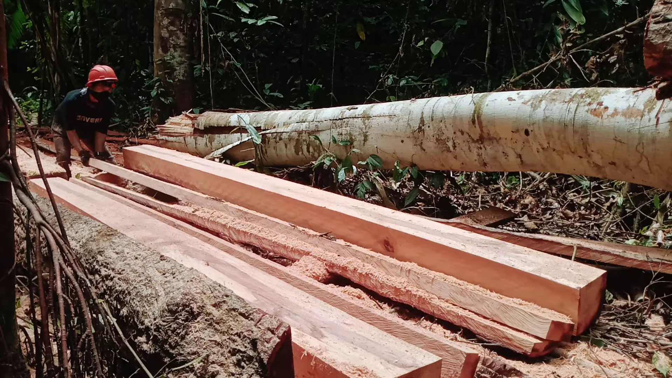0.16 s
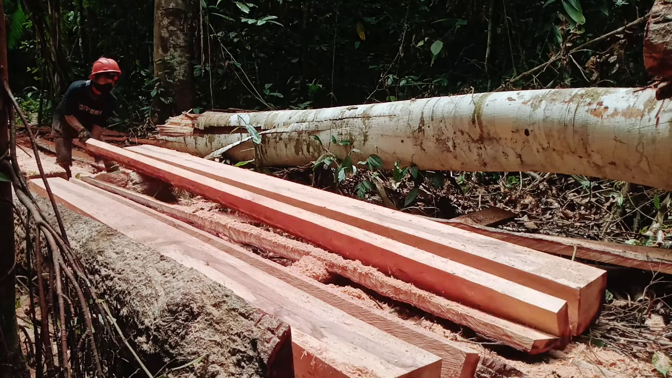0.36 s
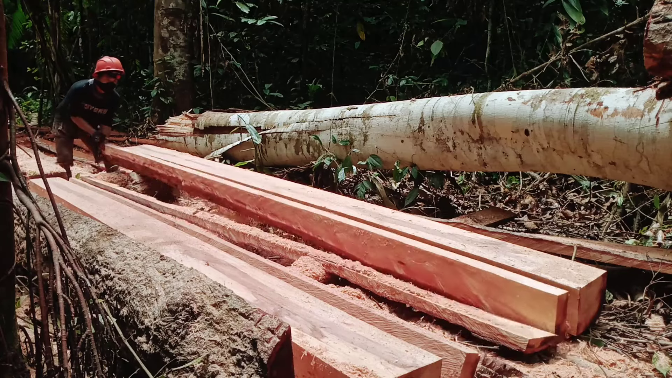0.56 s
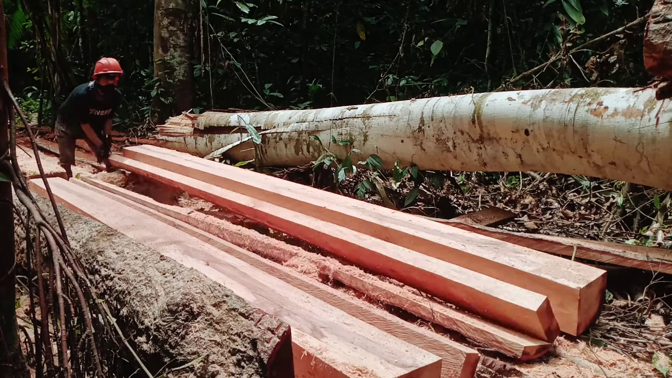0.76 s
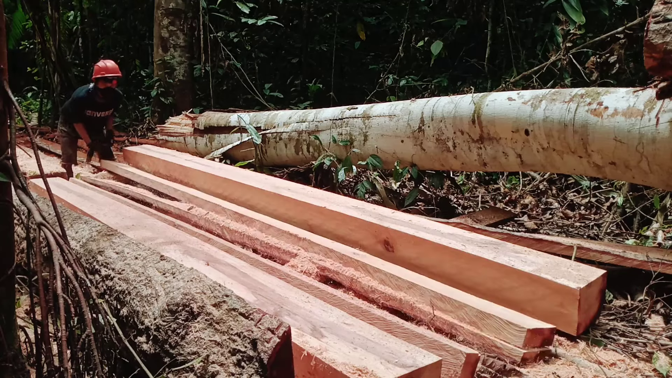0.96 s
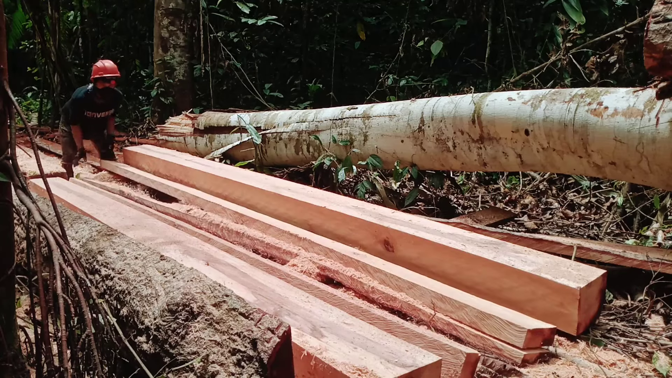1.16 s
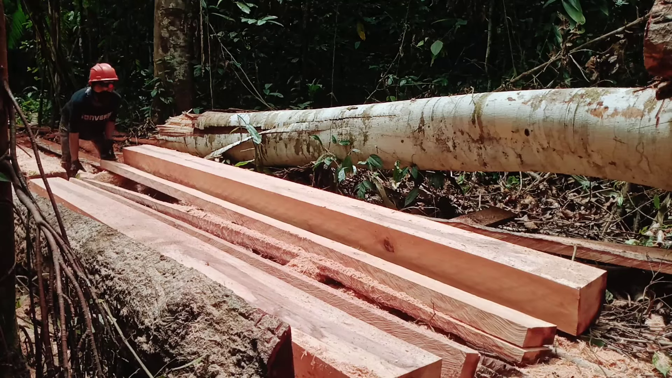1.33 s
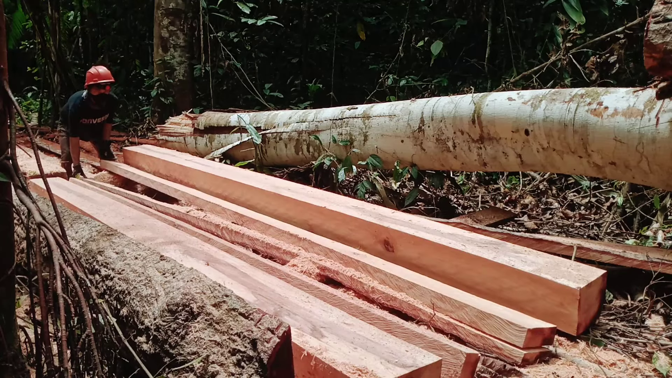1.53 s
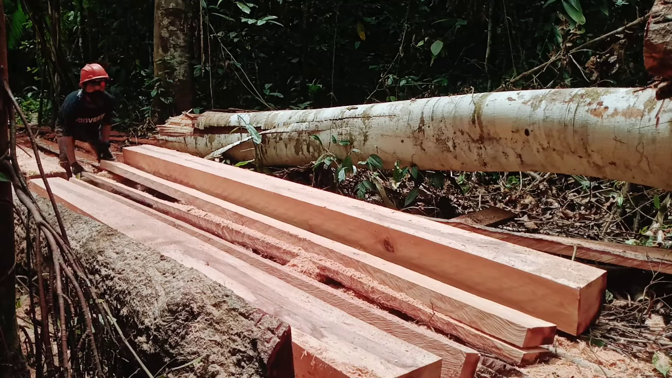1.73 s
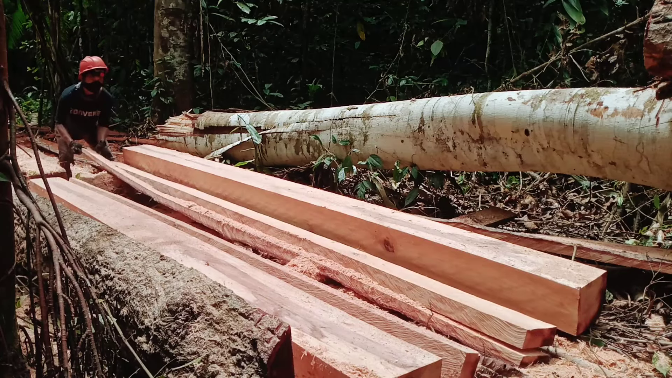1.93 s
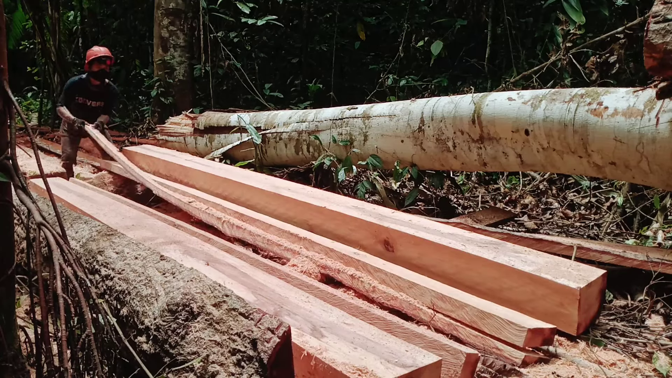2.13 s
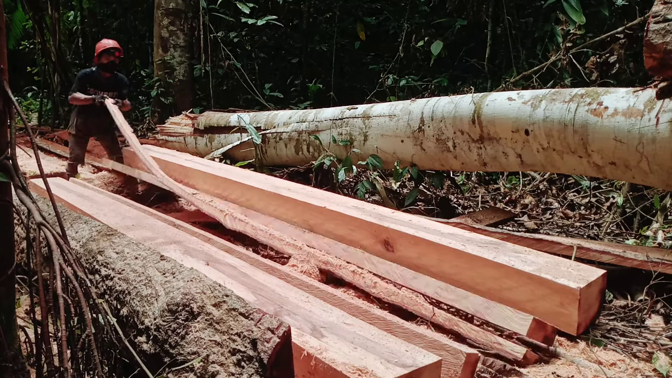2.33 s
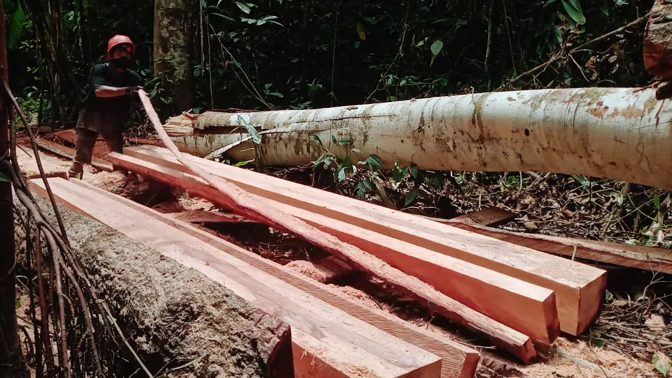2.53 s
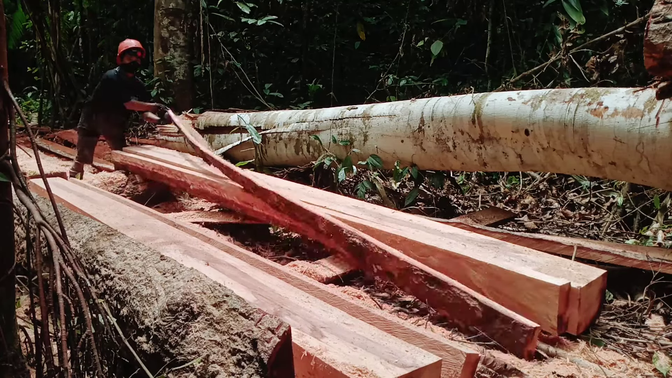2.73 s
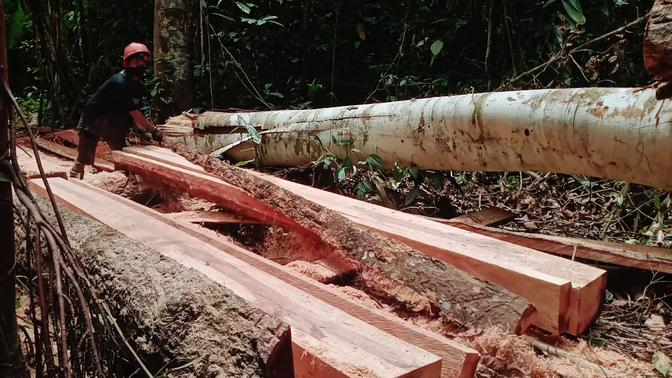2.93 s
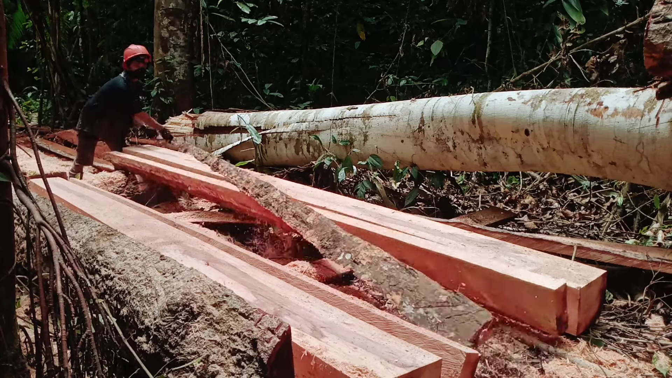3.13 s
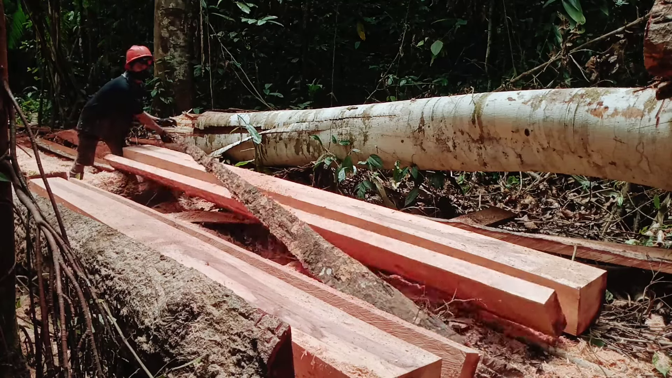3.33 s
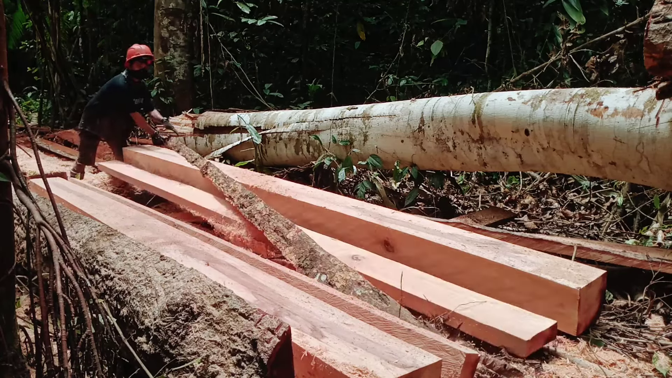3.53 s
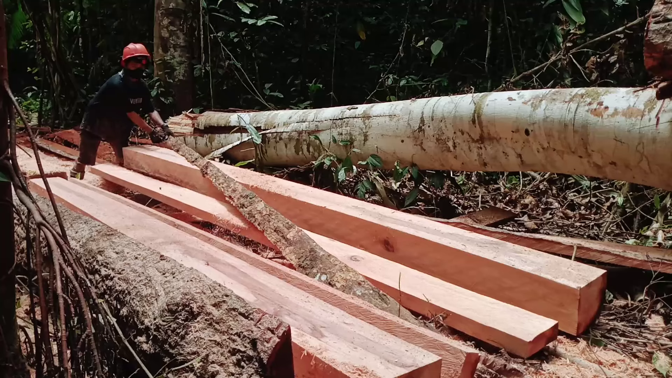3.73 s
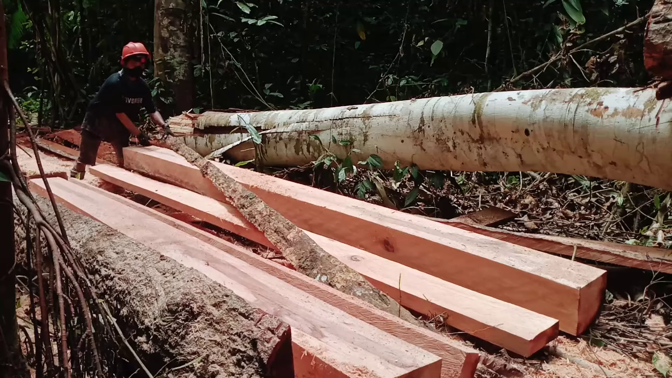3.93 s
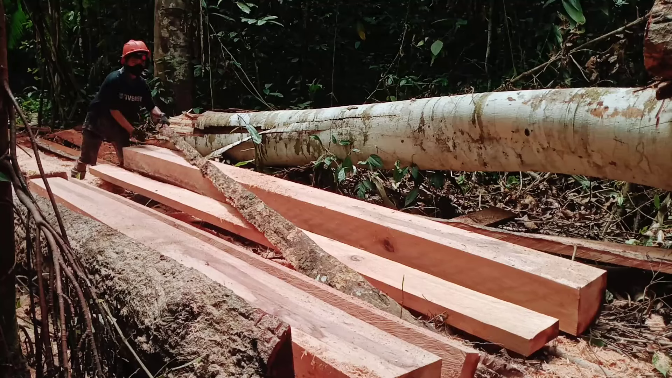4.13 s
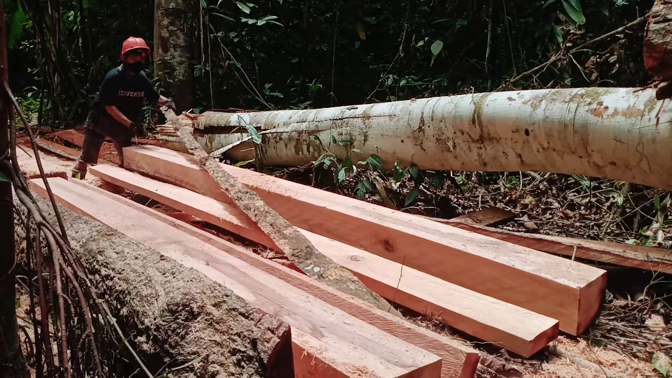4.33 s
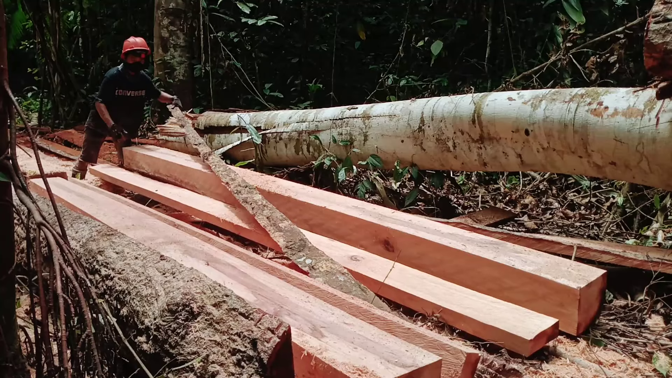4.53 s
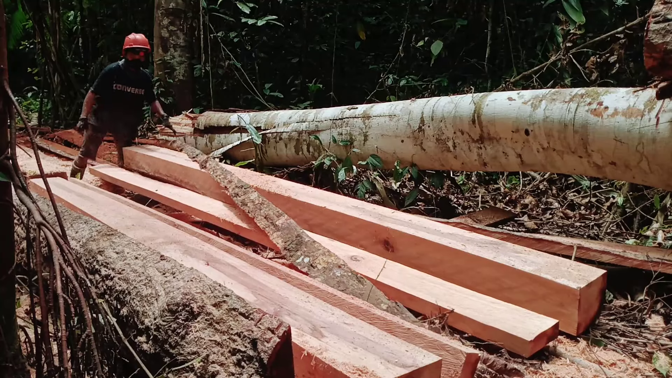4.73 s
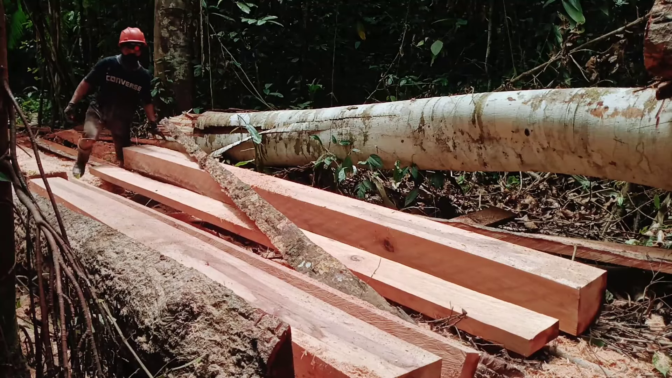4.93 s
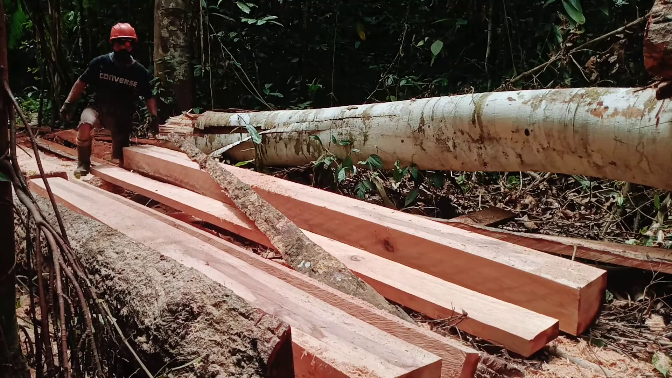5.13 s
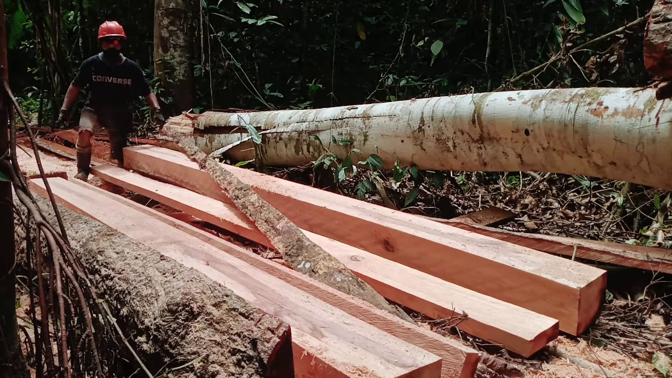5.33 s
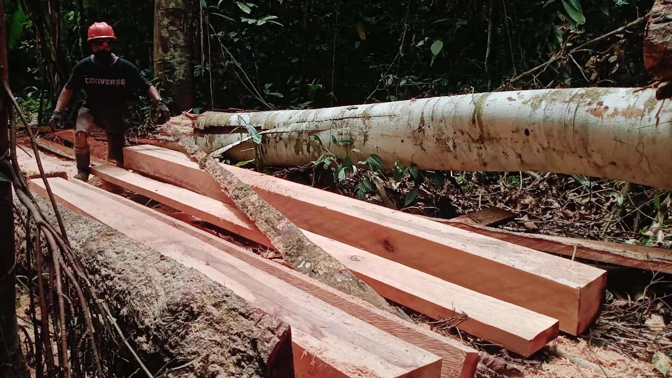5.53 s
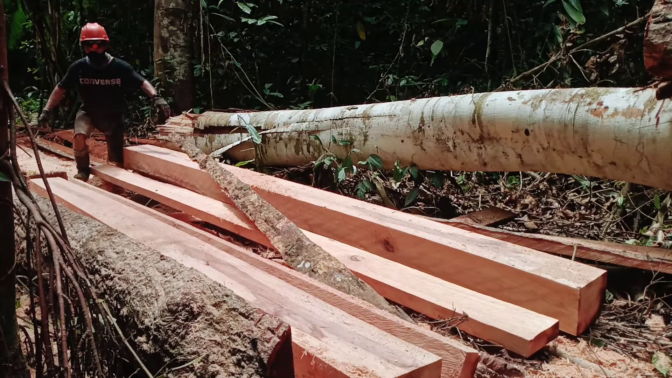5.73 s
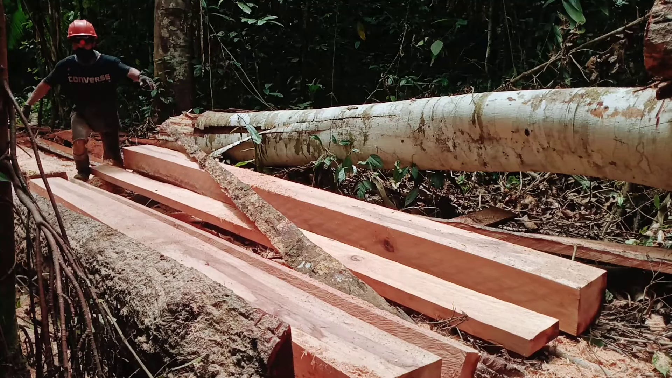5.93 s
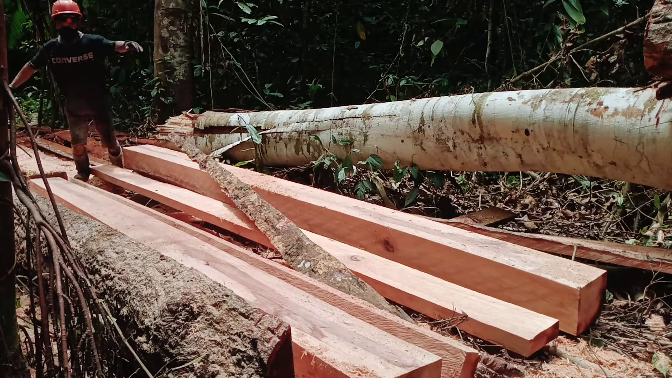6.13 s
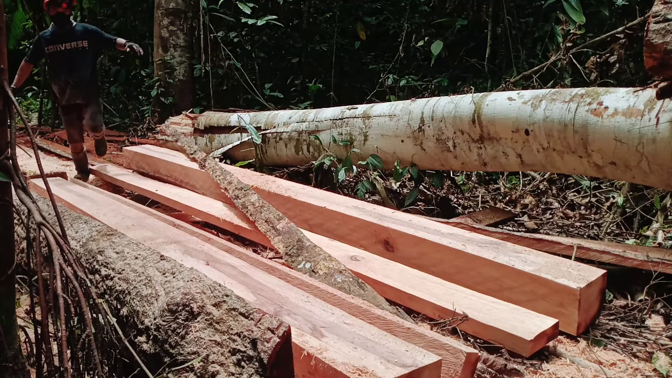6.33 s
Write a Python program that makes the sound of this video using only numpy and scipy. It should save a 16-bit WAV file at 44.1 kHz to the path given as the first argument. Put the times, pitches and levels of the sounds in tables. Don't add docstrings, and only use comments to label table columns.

```python
import sys
import numpy as np
from scipy import signal
from scipy.fft import rfft, irfft, next_fast_len
from scipy.io import wavfile
from scipy.ndimage import uniform_filter1d

SR = 44100
rng = np.random.default_rng(int(sys.argv[2]) if len(sys.argv) > 2 else 0)


def transcribe(signal):
    frames = np.atleast_2d(signal).T
    limited = np.clip(frames, -1, 1)
    pcm = np.round(limited * 32767).astype(np.int16)
    wavfile.write(sys.argv[1], SR, pcm)


def linear_from_db(decibels):
    return 10 ** (np.asarray(decibels, float) / 20)


N = 285969
CLOCK = 32


def colour(x, points):
    hz, db = np.transpose(points)
    size = next_fast_len(len(x), True)
    log_f = np.log(np.fft.rfftfreq(size, 1 / SR) + 1)
    outside = np.maximum(np.log(hz[0]) - log_f, 0) + np.maximum(log_f - np.log(hz[-1]), 0)
    gain = linear_from_db(np.interp(log_f, np.log(hz), db) - 25 * outside)
    return irfft(rfft(x, size) * gain, size)[:len(x)]


def band(x, lo_hz, hi_hz, order=2):
    return signal.sosfilt(signal.butter(order, [lo_hz, hi_hz], "band", fs=SR, output="sos"), x)


def unit(x):
    return x / np.sqrt(np.mean(x ** 2))


def walk(rate):
    hold = int(SR / rate)
    steps = np.repeat(rng.standard_normal(N)[:N // hold + 1], hold)
    return 1.4 * uniform_filter1d(uniform_filter1d(steps, hold), hold)[:N]


def add(out, s, x):
    i = int(s * SR)
    out[i:i + len(x)] += x[:N - i]


def swell(s, db, rise_s, fall_s, hold_s=0):
    s, db, rise_s, fall_s, hold_s = (np.reshape(v, (-1, 1)) for v in (s, db, rise_s, fall_s, hold_s))
    t = np.arange(0, N, CLOCK) / SR
    before = np.maximum(s - t, 0) / np.abs(rise_s)
    after = np.maximum(t - s - hold_s, 0) / np.abs(fall_s)
    return linear_from_db(db - 10 * (before + after))


def together(*gains):
    power = np.sum(np.vstack(gains) ** 2, axis=0)
    return np.interp(np.arange(N) / CLOCK, np.arange(len(power)), np.sqrt(power))


def ring(modes, stretch, longest, tilt_db=0, phase=0):
    hz, db, t60 = np.transpose(modes)[:, :, None]
    t = np.arange(.36 * SR) / SR
    decay = np.exp(-np.log(1000) * t / (stretch * np.minimum(t60, longest)))
    decay = decay * (1 - (t / t[-1]) ** 4)
    return np.sum(linear_from_db(db + tilt_db) * decay * np.sin(2 * np.pi * hz * t + phase), axis=0)


def resonate(x, hz, t60):
    r = 1000 ** (-1 / (t60 * SR))
    return unit(signal.lfilter([1, -1], [1, -2 * r * np.cos(2 * np.pi * hz / SR), r * r], x))


def grains(rate, scatter_db):
    size = linear_from_db(scatter_db * np.minimum(rng.exponential(size=N), 3.2)) * rng.choice([-1, 1], N)
    return size * (rng.random(N) < rate / SR)


def clearing(x, t60, wet_db):
    t = np.arange(.4 * SR) / SR
    tail = rng.standard_normal(len(t)) * np.exp(-np.log(1000) * t / t60) * np.minimum(t / 0.0035, 1)
    return x + linear_from_db(wet_db) * signal.fftconvolve(x, tail / np.linalg.norm(tail))[:N]


# (f/Hz, level per Hz/dB)
FOREST_SPECTRUM = [(22, -30), (45, -17.5), (96, -7.5), (200, -11.5), (500, -14.5), (2000, -21.5),
                   (3200, -21.5), (5100, -32.5), (6000, -17.5), (7000, -32), (8700, -24.5), (9900, -33),
                   (13000, -37), (15500, -35)]
# (t/s, level at 6 kHz/dB)
CHORUS_LEVEL = [(0, -74.5), (.6, -70), (1.1, -72), (1.5, -73.5), (2.1, -74), (2.6, -70), (3.0, -67),
                (3.6, -70), (4.1, -74), (4.6, -72), (5.1, -73.5), (5.7, -73), (6.48, -74.5)]
# (start t/s, duration t/s, level/dB, f/Hz)
KATYDID_SWELLS = [
    (0, 0.153, -65.5, 14520),
    (1.93, .04, -80.5, 14200),
    (3.849, .45, -80.5, 14200),
    (4.998, 0.25, -78, 14100),
    (5.851, 0.401, -76, 14140),
]
KATYDID_RISE_S, KATYDID_FALL_S = 0.1998, .12
KATYDID_CHIRPS_HZ, KATYDID_SAG_HZ = 24, 400
FAR_CRICKETS_HZ, FAR_CRICKETS_DB = 8540, 2.5


def forest():
    t = np.arange(N) / SR
    bed = colour(rng.standard_normal(N), FOREST_SPECTRUM)
    bed /= np.std(band(bed, 5600, 6540, order=4))
    far_crickets = unit(band(rng.standard_normal(N), FAR_CRICKETS_HZ - 260, FAR_CRICKETS_HZ + 260))
    bed += linear_from_db(FAR_CRICKETS_DB + 3.0 * walk(11)) * far_crickets
    bed_gain = linear_from_db(np.interp(t, *np.transpose(CHORUS_LEVEL)) + 0.91 * walk(5.1))

    start, lasts, db, hz = np.transpose(KATYDID_SWELLS)
    swells = swell(start, db, KATYDID_RISE_S, KATYDID_FALL_S, lasts)
    loudest_hz = np.repeat(hz[swells.argmax(axis=0)], CLOCK)[:N]
    chirp = t * KATYDID_CHIRPS_HZ % 1
    trill_hz = loudest_hz + KATYDID_SAG_HZ * (.5 - chirp)
    rasp = band(rng.standard_normal(N), 30, 300) * (1.3 + np.sin(np.pi * chirp) ** 2)
    trill = unit(rasp * np.sin(2 * np.pi * np.cumsum(trill_hz) / SR))
    return bed * bed_gain + trill * together(swells)


# (start t/s, end t/s)
CRICKET_PHRASES = [(0, .134), (.914, .964), (1.034, 1.082), (1.178, 1.207), (1.25, 1.304), (1.359, 1.411),
                   (1.453, 1.53), (1.56, 1.63), (1.651, 2.15), (2.657, 2.75), (2.81, 2.874), (2.936, 3.004),
                   (3.111, 3.18), (3.228, 3.29), (3.339, 3.403), (3.436, 3.487), (3.589, 4.127),
                   (4.623, 4.70), (4.875, 4.949), (4.966, 4.972), (5.009, 5.058), (5.103, 5.153),
                   (5.185, 5.242), (5.27, 5.34), (5.377, 5.452), (5.47, 5.55), (5.577, 6.018)]
CRICKET_DB = -57.5
STROKE_SAG_HZ, STROKE_DRIFT, STROKE_SLIP = 330, .003, .9


def cricket(rate_hz=83.7, tone_hz=8590):
    out = np.zeros(N)
    t = np.arange(int(0.00812 * SR)) / SR
    chance = rng.standard_normal((len(CRICKET_PHRASES), 100, 3))
    for (start, end), draws in zip(CRICKET_PHRASES, chance):
        phases = STROKE_SLIP * np.cumsum(draws[:, 2])
        strokes = int((end - start) * rate_hz * 2 + .5)
        for k, (size, drift, _) in enumerate(draws[:strokes]):
            hz = tone_hz * (1 + STROKE_DRIFT * drift) + STROKE_SAG_HZ * (.5 - t / t[-1])
            tone = np.sin(2 * np.pi * np.cumsum(hz) / SR + phases[k]) * np.hanning(len(t)) ** 0.74
            db = CRICKET_DB + 10.0 - 9.5 * (k % 2) + 0.83 * size
            add(out, start + k / rate_hz / 2, linear_from_db(db) * tone)
    return clearing(out, .06, -11)


# (start t/s, end t/s, level/dB)
GATE_DUCKS = [(0.123, 0.276, -6.5), (0.399, 0.492, -9), (1.316, 1.375, -9.5), (1.414, 1.478, -7),
              (1.535, 1.581, -5.5), (2.139, 2.28, -7), (2.318, 2.35, -12.5), (3.171, 3.221, -8),
              (4.139, 4.306, -16.5), (4.602, 4.627, -12), (4.972, 5.025, -10), (5.016, 5.141, -3),
              (5.063, 5.105, -4.5), (5.345, 5.37, 1.5), (6.018, 6.601, -15)]
GATE_LINGER, GATE_RECOVER_S = 0.22, 0.09


def gate():
    t, duck_db = np.arange(N) / SR, np.zeros(N)
    for start, end, db in GATE_DUCKS:
        shut = np.clip(np.minimum((t - start) / 0.0265, (end - t) / 0.011), 0, 1)
        linger = (t > end - .012) * GATE_LINGER * np.exp(-np.abs(t - end) / GATE_RECOVER_S)
        duck_db += db * np.maximum(shut, linger)
    return linear_from_db(duck_db)


# (t/s, peak level/dB, f/Hz)
SPLINTERS = [(.316, -42, 2500), (.577, -43, 1990), (.669, -36.5, 3000), (0.6832, -27.5, 1560),
             (.6965, -27, 2300), (.7015, -27.5, 1610), (.706, -38, 3490), (0.7473, -37.5, 1500),
             (.781, -43, 3400), (0.914, -39.5, 2200), (.959, -32.5, 1330), (1.016, -44, 1970),
             (1.0469, -45.5, 2110), (1.9696, -46, 2116), (2.0736, -47.5, 2250), (2.522, -29.5, 1223),
             (2.276, -48.5, 2430), (2.297, -47, 2900), (2.5869, -34.5, 3130), (2.6005, -31.5, 1777),
             (2.632, -37.5, 1780), (2.6543, -33, 1820), (2.689, -25, 2006), (2.938, -36, 1700),
             (2.949, -35, 2300), (2.955, -34, 1296), (2.961, -36.5, 2000), (2.981, -44.5, 2100),
             (3.013, -40.5, 3800), (3.148, -38, 1560), (3.166, -45, 3000), (3.242, -33, 2850),
             (3.3706, -34.5, 2460), (3.4524, -35, 4570), (3.532, -41.5, 4080), (4.4047, -47.5, 2892),
             (4.719, -46.5, 3505), (4.768, -46.5, 1440), (4.8555, -48.5, 2316), (4.8815, -42.5, 3200),
             (4.917, -42, 1410), (5.5654, -53.5, 3600)]
# (t/s, peak level/dB, f/Hz)
TWIGS = [(0.2741, -49, 1880), (0.3526, -47, 2500), (.643, -52, 3000), (.753, -40.5, 3500),
         (1.5839, -58, 2130), (1.8539, -47, 2810), (1.862, -51.5, 2000), (2.2633, -52, 3370),
         (2.303, -53, 3010), (2.4855, -44, 2000), (3.0066, -41, 3800), (3.5582, -33, 1300),
         (3.701, -43, 1460), (3.7837, -55.5, 1210), (4.9635, -56.5, 3000), (5.285, -59.5, 3495),
         (5.5875, -54.5, 3690)]
# (t/s, peak level/dB, f/Hz, relative top level/dB, tail t60/s)
CRACKS = [(2.3552, -31, 1106, -30, .012), (2.3575, -13.5, 2300, -25, .025), (2.3572, -29, 1377, -31, 0.02),
          (2.3607, -31, 2600, -14, .04), (2.5205, -30.5, 2600, -20, .03), (2.5235, -29, 3200, -20, .04),
          (.2918, -39, 1690, -6.5, 0.031), (.6495, -46, 3000, 4, .02), (.6763, -22.5, 3620, -15, 0.021),
          (.691, -23, 2410, -21.5, .02), (.7744, -34.5, 3700, -9.5, .02), (2.283, -62, 2995, 6, .02),
          (2.105, -66, 3000, 4, .02), (4.869, -51, 2000, -1.5, .03), (3.5407, -34, 2300, 1.5, 0.072),
          (4.7234, -47, 2400, 1.5, 0.032), (4.730, -47, 3000, 4.5, 0.0153),
          (4.7363, -42, 2500, -0.5, 0.0204), (4.7725, -48, 1940, 7, 0.025)]
SNAP_S = .0007
SPLINTER_TOP_DB, TWIG_TOP_DB, SNAP_T60_S = -19, -5, .035


def snaps():
    splinters = [(*row, SPLINTER_TOP_DB, SNAP_T60_S) for row in SPLINTERS]
    twigs = [(*row, TWIG_TOP_DB, SNAP_T60_S) for row in TWIGS]
    return splinters + twigs + list(CRACKS)


# (f/Hz, level per Hz/dB)
DUST = [(6000, -6.5), (7500, 1), (8900, 10), (10800, -4.5), (13000, -6.5), (15300, -7.5)]


def ticks():
    out, t = np.zeros(N), np.arange(8192) / SR
    spray = rng.standard_normal((len(snaps()), len(t)))
    for (s, db, hz, top_db, t60), noise in zip(snaps(), spray):
        noise = np.r_[2.5, noise[1:]]
        tail = 0.18 * np.exp(-np.log(1000) * t / max(t60, .005))
        push = noise * (np.exp(-t / SNAP_S) + tail)
        body = band(push, hz / 1.615, hz * 1.39, order=3)
        edge = colour(push, DUST)
        tick = body / np.abs(body).max() + linear_from_db(top_db + 9.5) * edge / np.abs(edge).max()
        add(out, s, linear_from_db(db + 0.04) * tick)
    return out


# (t/s, peak level/dB, contact f/Hz, ring stretch [ratio])
KNOCKS = [(0.28, -38.5, 421, 0.66), (.495, -33, 550, 0.32), (.5065, -26, 302.5, 0.594),
          (.531, -29.5, 281, 0.45), (.578, -30.5, 302, 0.54), (.59, -32.5, 697, 0.33),
          (0.5986, -32, 219, 0.63), (.668, -25, 1006, 0.71), (.677, -19.5, 1020, 0.616),
          (.686, -18.5, 817, 0.81), (.697, -23, 1062, 0.35), (.708, -37, 900, 0.41),
          (.7135, -30.5, 900, .3), (.772, -26.5, 730, 0.29), (.795, -28.5, 302, 0.478),
          (.89, -35.5, 700, .6), (.905, -31, 800, 0.3), (0.9604, -13.5, 270, 0.046),
          (.972, -18.5, 560, 0.75), (.983, -31, 190, .6), (1.085, -41, 100, .4), (1.175, -42, 110, .4),
          (2.947, -31, 365, .5), (4.87, -41.5, 249, 0.74), (3.553, -30, 650, 0.6), (3.555, -22, 145, 0.72),
          (3.5695, -23.5, 160, .5), (3.63, -35, 480, 0.58), (3.638, -21, 140, 0.423),
          (3.682, -28, 119.5, 0.32), (3.708, -29, 140.6, 0.54), (3.752, -25, 137.2, 0.5),
          (3.7735, -29, 170, .45), (4.482, -44, 478, 1), (4.759, -45.5, 300, 0.38),
          (4.772, -38.5, 249, 0.404), (4.779, -36.5, 200, 0.75), (3.14, -47.5, 191, 0.67),
          (5.244, -33.5, 598, 0.206), (5.258, -43, 652, 0.72), (5.433, -45.5, 499, 0.31),
          (5.53, -52.5, 620, 0.566), (2.358, -42, 910, 0.2), (2.522, -39, 700, 0.88)]
# (f/Hz, level/dB, t60/s)
BEAMS = [(106.2, -10.5, 0.58), (138.2, -5.5, .4), (162.84, -6.5, 0.42), (192.2, -4, 0.14),
         (255.34, -3, 0.36), (302.58, -3.5, 0.42), (364.8, -5.5, 0.39), (401, -10.5, 0.11),
         (450.8, -7, 0.38), (535.8, -1.5, 0.19), (588.4, -2.5, 0.18), (659.4, -3.5, 0.2),
         (756.2, -2.5, 0.19), (793, -6, 0.11), (1011, 1, 0.13), (1010.3, -3, 0.074), (1210, -12.5, 0.18),
         (1560, -6, 0.19)]


def knocks():
    out = np.zeros(N)
    octave = np.log2(np.array(BEAMS)[:, :1])
    spot = rng.standard_normal((len(KNOCKS), 2, len(BEAMS), 1))
    for (s, db, hz, stretch), (size, turn) in zip(KNOCKS, spot):
        tilt_db = -14 * np.abs(octave - np.log2(hz)) + 2.5 * size
        blow = ring(BEAMS, max(stretch, .05), 1.0, tilt_db, 0.36 * turn)
        blow = np.convolve(blow, np.hanning(int(SR * .4 / hz) + 3))
        add(out, s, -blow * linear_from_db(db) / np.abs(blow).max())
    return out


# (fastest t/s, scrape level/dB, 10 dB rise t/s, 10 dB fall t/s, relative dust level/dB)
SLIDES = [(.30, -53, 0.0252, 0.086, -16.5), (.51, -59, 0.28, 0.1443, -8),
          (0.656, -57.5, 0.0144, -0.0363, 3), (0.699, -35, 0.029, 0.0171, -13),
          (0.745, -51, 0.05, 0.07, -12), (.87, -62, .1, .1, -12), (0.913, -52, 0.012, 0.01, -14),
          (.99, -55, -0.0052, 0.0785, -11), (1.1, -72, -0.7, 0.86, -16), (2.28, -67, 0.18, 0.96, -2.5),
          (2.37, -48, 0.0167, 0.04, -11.5), (2.527, -41.5, 0.005, 0.0149, -13),
          (2.73, -53.5, 0.1723, 0.1772, -11.5), (2.955, -50, 0.06, 0.12, -1.5),
          (3.27, -57.5, 0.35, 0.2663, -4.5), (3.375, -48, .035, 0.06, -10), (3.483, -46, 0.07, .006, -11),
          (3.53, -64, 0.1, 0.22, -7), (3.58, -51.5, 0.23, 0.0191, -11), (3.85, -72, 1, 0.62, -12),
          (4.41, -55, 0.0685, 0.1849, -7.5), (4.74, -61, -0.51, 0.1745, -10.5),
          (4.919, -58.5, 0.0673, 0.0429, -12.5), (5.259, -68, 0.22, 0.22, -3.5),
          (5.58, -67.5, -0.03, 0.11, -14)]
# (start t/s, duration t/s, level/dB, f/Hz)
JUDDERS = [(0.284, 0.0391, -40, 291.6), (0.51, 0.124, -40.5, 215), (0.718, 0.157, -41, 199.4),
           (0.954, 0.0106, -42.5, 175), (0.984, 0.0378, -35.5, 189.5), (1.053, .07, -52, 193),
           (2.705, 0.083, -35.5, 160), (2.98, 0.12, -56, 255), (3.4, 0.122, -52.5, 262),
           (3.56, 0.1023, -32, 174.4), (3.713, 0.0616, -36.5, 148.6), (3.88, .06, -61, 100),
           (4.317, 0.125, -62, 240.2), (4.47, 0.105, -54, 246.2), (4.774, 0.1585, -50, 202.5),
           (5.197, 0.0217, -65, 249.8), (5.248, 0.0184, -52, 229.4)]
# (f/Hz, level/dB, t60/s)
STACK = [(82.6, -1.5, 0.75), (104.14, 0.5, 0.87), (137.6, 4, 0.37), (164.5, -4, 0.32), (195.3, 0, 0.26),
         (251.56, 0.5, .4), (292.6, -2, .4), (359.8, -1, 0.13)]
# (f/Hz, level per Hz/dB)
GRIT = [(900, -3), (1500, 0), (2600, -2.5), (3700, -0.5), (5200, -18.5), (6500, -14.5), (7500, -13.5)]
JUDDER_RISE_S, JUDDER_FALL_S = 0.0068, .04
JUDDER_TAIL_DB, JUDDER_TAIL_S = -20.5, 0.12
RATTLE_BLOW_DB, RATTLE_DB_PER_OCTAVE, RATTLE_FALL_S = -9.5, 8, .022
RATTLE_SLIDE_DB, RATTLE_JUDDER_DB = -4, -24.5
SHOWER_DB, SHOWER_DUST_DB, SHOWER_FALL_S = -18.5, -13.5, 0.012


def drag():
    s, db, rise_s, fall_s, dust_db = np.transpose(SLIDES)
    slide = swell(s, db, rise_s, fall_s)
    s, db = np.transpose(snaps())[:2]
    shower = swell(s + 2 * SNAP_S, db + SHOWER_DB, SNAP_S, SHOWER_FALL_S)
    slap_s, slap_db, slap_hz = SLAP[0]
    blows = [row[:3] for row in KNOCKS] + [(slap_s + 0.0029, slap_db - 10.5, slap_hz)]
    s, db, hz = np.transpose(blows)
    softness_db = RATTLE_DB_PER_OCTAVE * np.minimum(np.log2(hz / 600), 0)
    chatter = swell(s + .006, db + RATTLE_BLOW_DB + softness_db, 0.003, RATTLE_FALL_S)
    s, lasts, db, hz = np.transpose(JUDDERS)
    judder = swell(s, db, JUDDER_RISE_S, JUDDER_FALL_S, lasts)
    judder_tail = swell(s, db + JUDDER_TAIL_DB, JUDDER_RISE_S, JUDDER_TAIL_S, lasts)

    grit_gain = together(slide, shower)
    dust_gain = together(slide * linear_from_db(dust_db)[:, None], shower * linear_from_db(SHOWER_DUST_DB))
    rattle_gain = together(chatter, slide * linear_from_db(RATTLE_SLIDE_DB), judder * linear_from_db(RATTLE_JUDDER_DB))
    rumble_gain = together(judder, judder_tail)

    slips, patch = grains(4800, 4.2), walk(35)
    grit = unit(colour(slips, GRIT)) * linear_from_db(2.8 * patch - 1.5)
    fine_slips = slips + 0.53 * grains(7600, 4.4)
    dust = unit(colour(fine_slips, DUST)) * linear_from_db(1.4 * patch + 1.1 * walk(40) + 4.5)
    bumps = signal.fftconvolve(grains(900, 2.2), ring(OFFCUT, 0.15, .25))[:N]
    rattle = unit(band(bumps, 450, 1250)) * linear_from_db(-3.0)

    octave = np.log2(hz)[judder.argmax(axis=0)]
    near = np.array([linear_from_db(mode_db - 11.58 * np.abs(octave - np.log2(mode_hz))) for mode_hz, mode_db, _ in STACK])
    near = np.repeat(near / np.linalg.norm(near, axis=0), CLOCK, axis=1)[:, :N]
    near = uniform_filter1d(near, size=400)
    rumble = np.zeros(N)
    for share, (mode_hz, _, t60) in zip(near, STACK):
        rumble += share * resonate(grains(300, 3), mode_hz, .55 * t60)
    rumble = unit(band(rumble, 55, 430)) * linear_from_db(-2.5)
    return grit_gain * grit + dust_gain * dust + rattle_gain * rattle + rumble_gain * rumble


# (t/s, peak level/dB, squeezed air f/Hz)
SLAP = [
    (2.687, -3.5, 684.8),
]
# (f/Hz, level/dB, t60/s)
OFFCUT = [(135, -14, .6), (199.6, -5, 0.26), (258.57, -21.5, 0.45), (295.5, -13, .6), (361.3, -2, 0.17),
          (484.7, -6, 0.27), (556.6, -10, 0.32), (612, 0, 0.19), (757.3, -1.5, 0.17), (851, -3, 0.066),
          (980, -2, 0.08), (1080, -8, 0.15), (1249, -24, 0.15), (1410, -18, 0.12)]


def slap():
    out, (s, db, air_hz) = np.zeros(N), SLAP[0]
    phase = np.pi * rng.random((len(OFFCUT), 1))
    blow = np.convolve(ring(OFFCUT, 1.0, 0.9, phase=phase), np.hanning(int(SR * 0.00091)))
    t = np.arange(len(blow)) / SR
    blow *= (1 - np.exp(-(t / 0.003) ** 2)) * .72 / np.abs(blow).max()
    puff = np.sin(2 * np.pi * air_hz * t - .6) * t / 0.002022 * np.exp(1 - t / 0.001482)
    add(out, s, linear_from_db(db) * (blow + puff))
    return out


# (start t/s, end t/s, first f/Hz, last f/Hz, level/dB)
SQUEAK = [
    (3.075, 3.168, 1270, 1450, -54.5),
]


def squeak():
    out, (start, end, from_hz, to_hz, db) = np.zeros(N), SQUEAK[0]
    n = int((end - start) * SR)
    hz = np.linspace(from_hz, to_hz, n) * (1 + 0.104 * walk(700)[:n])
    tone = np.hanning(n) ** 0.27 * np.sin(2 * np.pi * np.cumsum(hz) / SR)
    add(out, start, linear_from_db(db + 6.1 * walk(90)[:n]) * tone)
    return out


def scene():
    gate_gain = gate()
    impacts = clearing(ticks() + knocks() + slap() + squeak(), 0.2726, -11.5)
    timber = impacts + gate_gain * drag()
    no_bass = signal.butter(3, 60, "high", fs=SR, output="sos")
    timber = signal.sosfilt(np.tile(no_bass, (2, 1)), timber)
    return (timber + gate_gain * (forest() + cricket()))[None]


def roll_off(x):
    return signal.sosfilt(signal.butter(12, 16470, fs=SR, output="sos"), x)


def record(dry):
    top_cut = signal.ellip(8, .2, 60, 15750, fs=SR, output="sos")
    mix = signal.sosfilt(top_cut, dry)
    return roll_off(mix)


dry = scene()
out = record(dry)
transcribe(out)
```